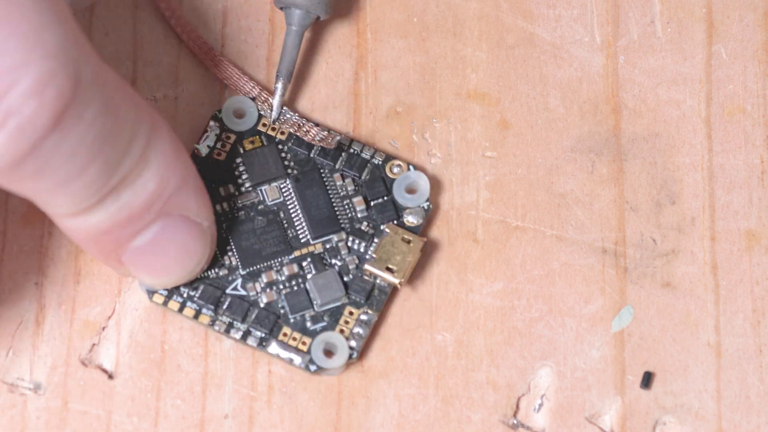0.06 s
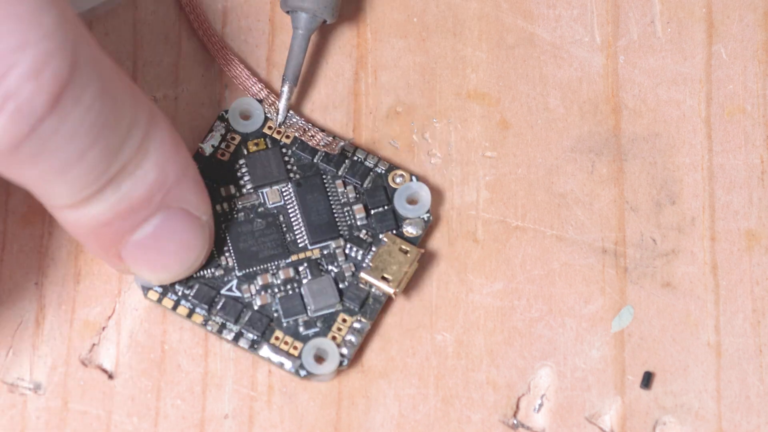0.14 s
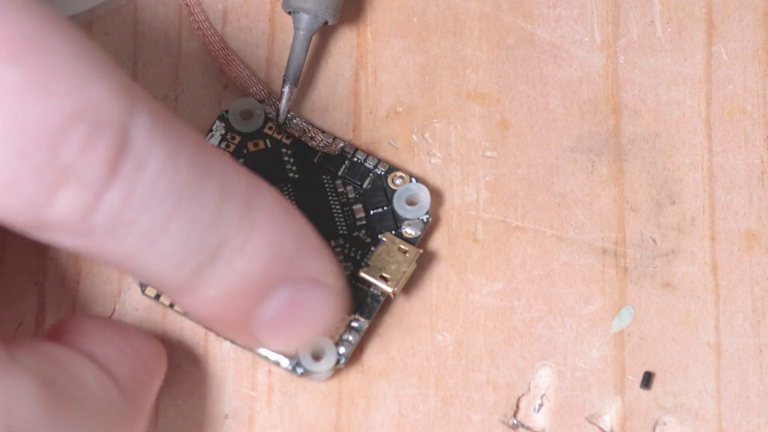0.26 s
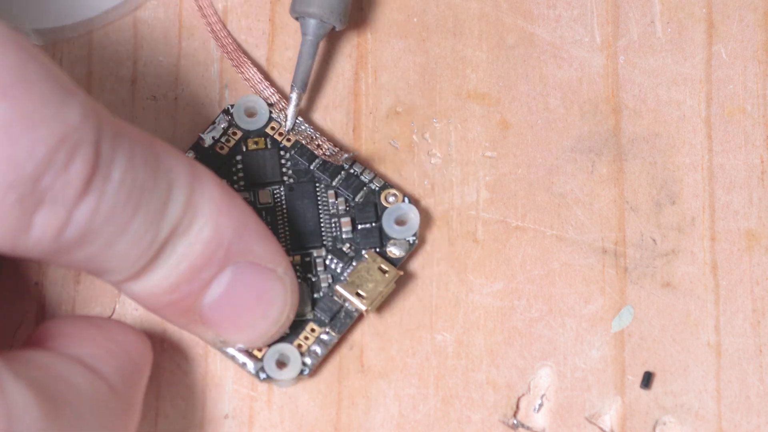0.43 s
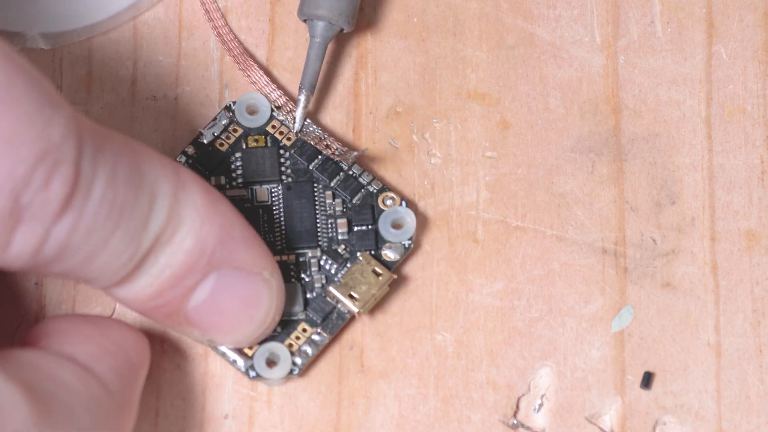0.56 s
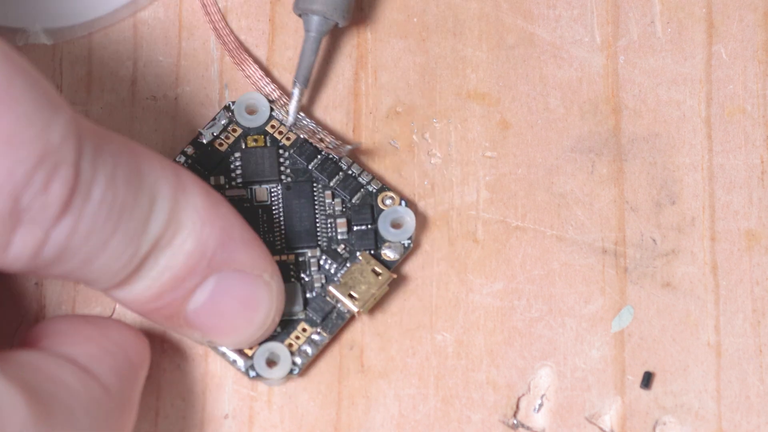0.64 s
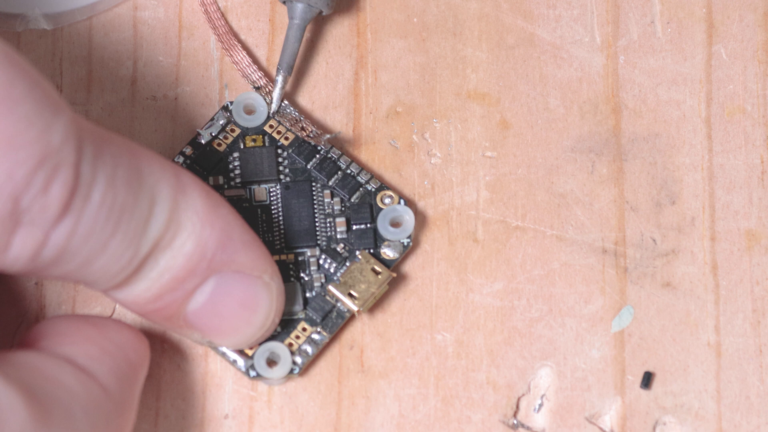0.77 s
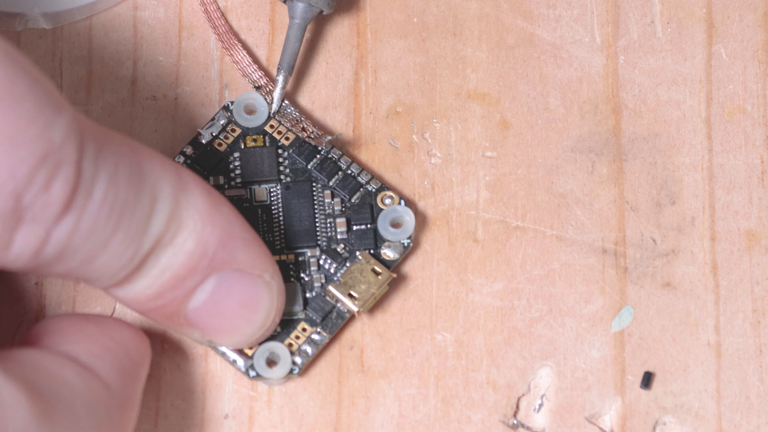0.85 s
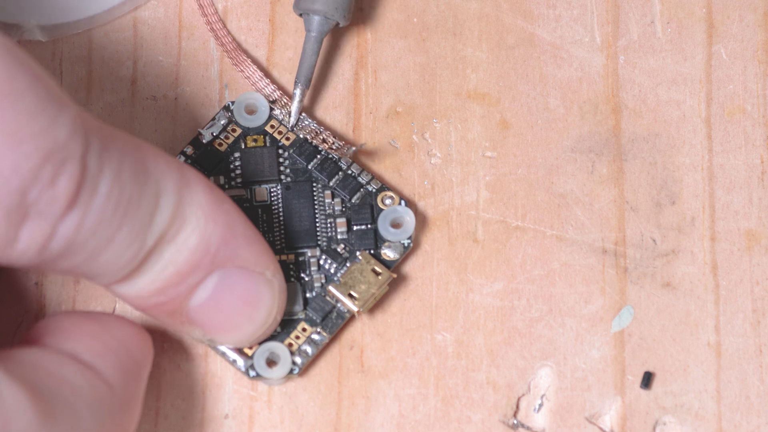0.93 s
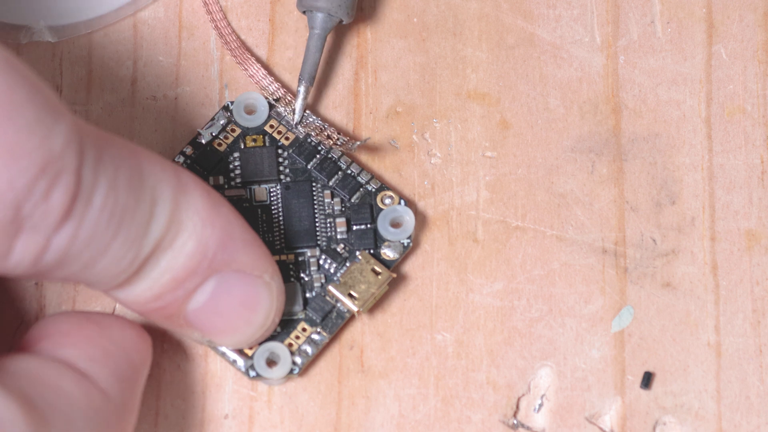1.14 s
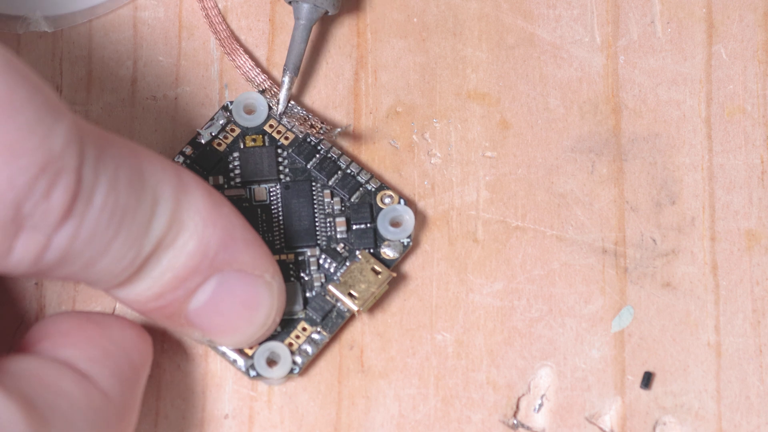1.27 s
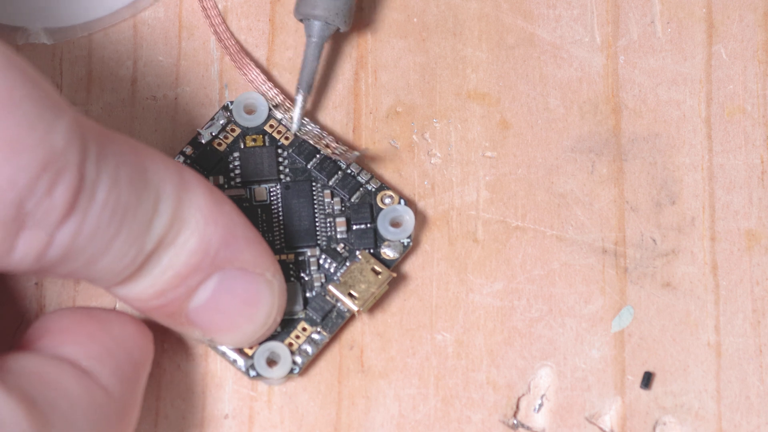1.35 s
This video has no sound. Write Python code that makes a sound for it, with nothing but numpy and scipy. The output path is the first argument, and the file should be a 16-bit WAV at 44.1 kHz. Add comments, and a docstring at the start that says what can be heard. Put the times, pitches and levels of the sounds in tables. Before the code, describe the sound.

A bright click and a sharp snap sound from a little circuit board on wood under a soldering iron. Hot flux fizzes softly and the tip ticks on copper braid, over low fan hum and close microphone hiss.

```python
"""A faint scrape and sizzle lead into a bright click and a sharp snap: desoldering on a wooden bench.
The iron's steel tip strikes a small circuit board, then the board lands on the wood; each impact
excites damped modes and a brief reverberation. The tip scrapes and ticks on the copper braid while
hot flux fizzes. Behind it a fan hums in the small room and a close stereo microphone hisses."""
import sys
import numpy as np
from scipy import signal
from scipy.fft import rfft, irfft, next_fast_len
from scipy.io import wavfile
from scipy.ndimage import uniform_filter1d, map_coordinates

SR = 44100
rng = np.random.default_rng(int(sys.argv[2]) if len(sys.argv) > 2 else 0)


def generate_wav(sig):
    """Save sig (samples, or channels by samples) to the path in sys.argv[1] as 16-bit PCM at SR."""
    pcm = np.round(np.clip(np.atleast_2d(sig).T, -1, 1) * 32767).astype(np.int16)
    wavfile.write(sys.argv[1], SR, pcm)


N = 61739


# modes of the tip on the board: pitch_hz, level_db, t60_s, left_minus_right_db
CLICK_MODES = [(1995, -23.5, 0.016, 1), (2900, -20.5, 0.011, -4), (3450, -33, 0.0123, 0),
               (3820, -19.8, 0.0086, -9), (4600, -6, 0.0023, -7.5), (5300, -10.5, 0.011, -8.5),
               (6200, -10, 0.0029, 1), (7420, -15, 0.0073, -6), (8100, -24.5, 0.0114, -3),
               (8850, -21, 0.014, -8), (9540, -26, 0.0103, 9), (10830, -28, 0.012, -16),
               (11300, -31, 0.01, -16), (13140, -25, 0.0108, 8), (15290, -27, 0.0104, -9)]
# modes of the wooden bench: pitch_hz, level_db, t60_s, left_minus_right_db
THUD_MODES = [(205, -41.5, 0.058, 0), (261, -35.5, 0.11, 0), (501, -40.5, 0.065, 0), (1390, -44, 0.034, 0)]
# spectrum the click sends into the room: frequency_hz, relative_db
CLICK_REVERB_SPECTRUM = [(200, -15), (500, -16), (800, -7.5), (1100, -22), (1400, -8.5), (2100, -16),
                         (2700, -10), (3500, 5), (4200, -10), (5400, 0.5), (6500, -9.5), (8700, -10),
                         (11000, -13.5), (16000, -20)]
def tip_click(start_s=0.22073, click_db=0.5, bench_lag_s=0.0033):
    """Impact excitation: steel on the board rings high modes, then the bench's low modes thud."""
    click = ring(start_s, CLICK_MODES)
    click = filtered(click, lambda f: low_cut(f, 710, q=1.0) / (1 + (f / 18000) ** 4))
    thud = filtered(ring(start_s + bench_lag_s, THUD_MODES), lambda f: low_cut(f, 80))
    reverb = reverberation(start_s, CLICK_REVERB_SPECTRUM,
                           bench_db=-22, room_db=-31, delay_s=0.0026, low_hz=244)
    return amp(click_db) * with_echoes(click) + thud + reverb


# modes of the board on the wood: pitch_hz, relative_db, t60_s, left_minus_right_db
PLATE_MODES = [(2114, 2.0, 0.0082, -1), (2700, -13.5, 0.01, -5), (3070, -22.5, 0.033, -6),
               (4090, -18, 0.014, -2), (5200, -15, 0.0098, -6), (5700, -17.5, 0.011, -11),
               (7320, -22.5, 0.017, 0), (8750, -21.5, 0.009, -12.5), (10540, -23.6, 0.0045, 13),
               (11370, -38.0, 0.0156, 11), (13500, -39, 0.0157, -2)]
# the board's graze, landing and bounce: start_s, relative_db
BOARD_IMPACTS = [(0.3896, -30), (0.3921, 0), (0.4111, -24.5)]
# spectrum the landing sends into the room: frequency_hz, relative_db
BOARD_REVERB_SPECTRUM = [(300, -25), (800, -7.5), (1500, -18.5), (1850, -7), (2180, 2.5), (2600, -7),
                         (3050, -2), (3800, -9), (4700, -14), (5800, -7.5), (7300, -34), (8700, -17),
                         (10000, -31), (16000, -27)]
def board_tap():
    """Plate radiation: the struck board rings mainly in one mode and is too small to radiate much bass."""
    tap = sum(amp(db) * ring(start_s, PLATE_MODES, polarity=1) for start_s, db in BOARD_IMPACTS)
    tap = filtered(tap, lambda f: low_cut(f, 2600, q=1.0) * low_cut(f, 2060, q=1.41)
                   * low_cut(f, 2210, q=1.4))
    landing_s = max(BOARD_IMPACTS, key=lambda impact: impact[1])[0]
    snap = amp(-29.5) * contact_crack(landing_s, decay_s=0.00075, low_hz=6000, high_hz=7000)
    reverb = reverberation(landing_s, BOARD_REVERB_SPECTRUM,
                           bench_db=-26, room_db=-29, delay_s=0.00208, low_hz=503)
    return with_echoes(amp(-5.5) * tap + snap) + reverb


CONTACT_RISE_S = 0.00008
def ring(start_s, modes, polarity=-1):
    """Modal superposition: damped sines add; neighbours swing in opposition (-1) or together (1)."""
    t = since(start_s)
    attack = 1 - np.exp(-t / CONTACT_RISE_S)
    return attack * sum(polarity ** k * panned(db, pan_db) * decay(t, t60_s) * np.sin(2 * np.pi * hz * t)
                        for k, (hz, db, t60_s, pan_db) in enumerate(modes))


def contact_crack(start_s, decay_s, low_hz, high_hz, pan_db=-13):
    """Contact transient: a brief impact gives a broadband burst, here stronger on the right."""
    t = since(start_s)
    noise = filtered(rng.standard_normal(N), lambda f: low_cut(f, low_hz) / (1 + 1j * f / high_hz))
    return panned(0, pan_db) * unit(noise) * (t > 0) * np.exp(-t / decay_s)


# small scrapes and squeaks of the tip and board, and a brief, faint hiss near 14 kHz at 1.1 s:
# start_s, level_db, pitch_hz, length_s, resonance_q
BURSTS = [(0.051, -50.5, 3000, 0.03, 1.1), (0.117, -41, 2770, 0.0022, 1.8),
          (0.2115, -36, 5500, 0.0037, 0.68), (0.322, -37.5, 3020, 0.0035, 0.81),
          (0.341, -43.5, 2090, 0.011, 4.3), (0.493, -46, 2800, 0.027, 1.1),
          (0.574, -45.5, 5970, 0.012, 0.7), (0.787, -40.5, 12000, 0.0049, 2.7),
          (0.8, -49, 2900, 0.018, 2.8), (0.825, -51.5, 1590, 0.014, 5.5), (.86, -50, 974, .06, 8.8),
          (0.89, -41, 5800, 0.032, 1.5), (0.981, -49, 3500, 0.013, 0.36), (1.028, -44, 1730, 0.012, 4),
          (1.049, -47.5, 2570, 0.019, 0.45), (1.095, -50.5, 14000, .025, 1.6),
          (1.191, -48.5, 3480, 0.046, 1.9), (1.312, -40.5, 4460, 0.008, 1.8),
          (1.318, -44.5, 4400, 0.034, 1.6)]
def faint_bursts(rise_s=0.00053, tail_db=-15, tail_s=0.038):
    """Resonant filtering: short noise bursts sound as scrapes, squeaks or hiss, with faint room tails."""
    out = np.zeros((2, N))
    for start_s, db, hz, length_s, q in BURSTS:
        t = since(start_s)
        attack = 1 - np.exp(-t / rise_s)
        burst = np.exp(-(t / length_s) ** 2)
        tail = amp(tail_db) * np.exp(-t / tail_s)
        out += amp(db) * resonant_noise(hz, q) * attack * (burst + tail)
    return out


# loudness contour of the dragging braid: time_s, level_db
BRAID_LEVEL = [(0, -61.5), (.06, -52.5), (.14, -48.5), (.19, -52), (.3, -53), (.55, -59), (.62, -56),
               (.77, -58), (.82, -53.5), (.9, -53.5), (.97, -50.5), (1.06, -50), (1.11, -58.5), (1.22, -58),
               (1.3, -54), (1.4, -84)]
# spectrum of its friction: frequency_hz, relative_db
BRAID_SPECTRUM = [(700, -31), (1300, -4.5), (1800, -4.5), (2700, 2), (3600, -7.5), (5000, -5.5),
                  (9000, -25)]
def braid_rub(grain_db=2.5, flutter_db=3.0):
    """Sliding friction: the braid drags over the board, giving fine-grained, fluttering noise."""
    grains = patchy_noise(depth_db=2.0) * amp(grain_db * wobble(400))
    level_db = contour(BRAID_LEVEL) + flutter_db * wobble(69.88)
    return amp(level_db) * stereo(grains, BRAID_SPECTRUM, correlation=[(1500, 0.52), (6000, 0.4)])


# loudness contour of the hot flux: time_s, level_db
FLUX_LEVEL = [(0, -58), (.03, -45), (.1, -53), (.16, -50), (.2, -51.5), (.28, -48.5), (.34, -52.5),
              (.45, -44.5), (.55, -59), (.59, -48), (.67, -55), (.72, -48), (.76, -54.5), (.83, -44.5),
              (.882, -47.5), (.9, -43), (.935, -48.5), (.98, -47.5), (1.025, -59), (1.06, -51), (1.17, -61),
              (1.22, -54), (1.245, -49.5), (1.27, -48), (1.325, -48), (1.365, -65.5), (1.39, -47.5)]
# spectrum of its fizz: frequency_hz, relative_db
FLUX_SPECTRUM = [(500, -24), (1500, -16), (2800, -7), (4200, -4), (5800, 1), (8500, -2), (11000, -7),
                 (16000, -12)]
def flux_sizzle(grain_db=2, flutter_db=1):
    """Amplitude-modulated noise: flux fizzes under the hot tip in dense random grains."""
    grains = patchy_noise(depth_db=4.0) * amp(grain_db * wobble(900))
    level_db = contour(FLUX_LEVEL) + flutter_db * wobble(50.64)
    return amp(level_db) * stereo(grains, FLUX_SPECTRUM, correlation=[(3000, 0.8), (10000, 0.18)])


# hard surfaces close by, one echo each: delay_s, gain_db, left_minus_right_db
REFLECTORS = [(.0052, -22, 7), (.0089, -22, -6)]
def with_echoes(direct, dull_hz=9000):
    """Specular reflection: nearby surfaces add delayed, slightly dulled copies to the direct sound."""
    def response(f):
        paths = sum(panned(db, pan_db) * np.exp(-2j * np.pi * f * delay_s)
                    for delay_s, db, pan_db in REFLECTORS)
        return paths / (1 + 1j * f / dull_hz)
    return direct + filtered(direct, response)


# decay of the reflections from the bench: frequency_hz, t60_s
BENCH_DECAY = [(200, 0.11), (2000, 0.073), (14000, 0.069)]
# decay of the room: frequency_hz, t60_s
ROOM_DECAY = [(200, 0.35), (2000, 0.23), (5000, 0.16), (14000, 0.25)]
# likeness of left and right in the reflected sound: frequency_hz, correlation
REVERB_CORRELATION = [(300, 1), (2000, 0.47), (5000, 0), (14000, 0)]
def reverberation(start_s, spectrum, bench_db, room_db, delay_s, low_hz):
    """Diffuse reflection: an impact leaves noise that dies fast off the bench, slower in the room."""
    out = np.zeros((2, N))
    for db, t60_curve in (bench_db, BENCH_DECAY), (room_db, ROOM_DECAY):
        noise = stereo(rng.standard_normal((2, N)), spectrum, REVERB_CORRELATION)
        hz, frame_s, bands = signal.stft(noise, SR, nperseg=128)
        fade = decay(np.maximum(frame_s - start_s, 0), along(t60_curve, hz)[:, None])
        out += amp(db) * signal.istft(bands * fade, SR, nperseg=128)[1][:, :N]
    onset = 1 - np.exp(-since(start_s + delay_s) / CONTACT_RISE_S)
    return filtered(out * onset, lambda f: low_cut(f, low_hz))


# fan and mains tones: pitch_hz, rms_level_db, wander_db
HUM_TONES = [(100.8, -63.5, 1), (116.2, -62.5, 0.6), (292.7, -53.5, 1), (406.6, -59, 2.5), (471.4, -58, 2),
             (692, -63, 2.5), (778, -65.5, 2.5), (926, -65.5, 3), (1015, -65, 3), (1248, -68.5, 2.5)]
def fan_hum(drift_hz_per_db=1.205):
    """Line spectrum: fan and mains give steady tones that wander slightly in level and pitch."""
    hum = np.zeros(N)
    for hz, db, wander_db in HUM_TONES:
        peak = np.sqrt(2) * amp(db + wander_db * wobble(7.92))
        pitch_hz = hz + drift_hz_per_db * wander_db * wobble(11.98)
        hum += peak * np.sin(2 * np.pi * np.cumsum(pitch_hz) / SR)
    return hum


# spectrum of room air and microphone hiss: frequency_hz, relative_db
AIR_SPECTRUM = [(20, -29), (78, -26), (102, -9), (135, -18), (175, -22), (215, -12), (260, -7),
                (320, -13.5), (385, -5), (450, -8), (540, -12), (760, -8), (1000, -10.5), (1400, -16.5),
                (1750, -11), (2300, -18), (4000, -13.5), (8000, -20.5), (14700, -26), (16000, -27.5)]
# likeness of left and right in that noise: frequency_hz, correlation
AIR_CORRELATION = [(30, 0.63), (100, 0.81), (400, 0.89), (1000, 0.87), (2500, 0.13), (6000, 0.12),
                   (14000, 0.13)]
def air_and_hiss(level_db=-47):
    """Stationary noise: low room air is much alike in both channels, high hiss nearly independent."""
    return amp(level_db) * stereo(rng.standard_normal((2, N)), AIR_SPECTRUM, AIR_CORRELATION)


def amp(db):
    """Decibels to amplitude gain."""
    return 10 ** (np.asarray(db) / 20)


def panned(db, pan_db):
    """Level difference: left and right gains, the left pan_db above the right."""
    return amp([[db + pan_db / 2], [db - pan_db / 2]])


def unit(x):
    """Normalisation to rms 1."""
    return x / np.sqrt(np.mean(x ** 2) + 1e-20)


def since(start_s):
    """Seconds since start_s, zero before it."""
    return np.maximum(np.arange(N) / SR - start_s, 0)


def decay(t, t60_s):
    """Exponential damping: 60 dB down after t60_s."""
    return np.exp(-np.log(1000) * t / t60_s)


def contour(points):
    """Linear interpolation of (time_s, value) points at every sample."""
    return np.interp(np.arange(N) / SR, *np.transpose(points))


def along(points, hz):
    """Interpolation of (frequency_hz, value) points on a log frequency axis."""
    knots_hz, values = np.transpose(points)
    return np.interp(np.log(hz + 1), np.log(knots_hz + 1), values)


def wobble(rate_hz):
    """Random modulation: a smooth curve through rate_hz knots a second."""
    knots = rng.standard_normal(int(N * rate_hz / SR) + 4)
    return map_coordinates(knots, [np.arange(N) * rate_hz / SR])


def filtered(x, response):
    """Linear filtering: the spectrum of x times a frequency response."""
    size = next_fast_len(N + SR // 2)
    return irfft(rfft(x, size) * response(np.fft.rfftfreq(size, 1 / SR)), size)[..., :N]


def low_cut(f, hz, q=0.72):
    """Response of a two-pole high-pass."""
    return -f * f / (hz * hz - f * f + 1j * f * hz / q)


def stereo(pair, spectrum, correlation):
    """Mid-side mixing: two independent signals become a coloured, partly correlated pair of rms 1."""
    def response(hz):
        angle = np.arccos(np.clip(along(correlation, hz), -1, 1)) / 2
        return amp(along(spectrum, hz)) * [np.cos(angle), np.sin(angle)]
    mid, side = filtered(pair, response)
    return unit(np.array([mid + side, mid - side]))


def resonant_noise(hz, q):
    """Resonance: stereo noise band-passed twice around hz, at rms 1."""
    noise = stereo(rng.standard_normal((2, N)), [(1000, 0)], correlation=[(2000, 1.0), (6000, 0.23)])
    return unit(filtered(noise, lambda f: (1j * f * hz / q / (hz * hz - f * f + 1j * f * hz / q)) ** 2))


def patchy_noise(depth_db):
    """Spectral modulation: two noises whose colour shifts in small random patches."""
    bands = signal.stft(rng.standard_normal((2, N)), nperseg=512)[2]
    patches = uniform_filter1d(rng.standard_normal(bands.shape[1:]), size=10, axis=0)  # over frequency
    patches = uniform_filter1d(patches, size=7, axis=1)  # over time
    return signal.istft(bands * amp(depth_db * unit(patches)), nperseg=512)[1][:, :N]


def scene(left_lag_s=0.000045):
    """Arrival-time difference: the click is straight ahead; the rest reaches the right side first."""
    rest = board_tap() + faint_bursts() + braid_rub() + flux_sizzle() + fan_hum() + air_and_hiss()
    rest = filtered(rest, lambda f: np.exp(1j * np.pi * f * left_lag_s * np.array([[-1], [1]])))
    return tip_click() + rest


def record(dry, low_hz=72, top_hz=15950):
    """Band limiting: the deep bass rolls off and nothing passes above top_hz."""
    return filtered(dry, lambda hz: (hz < top_hz) / np.sqrt(1 + (low_hz / (hz + 1)) ** 6))


dry = scene()
out = record(dry)
generate_wav(out)
```